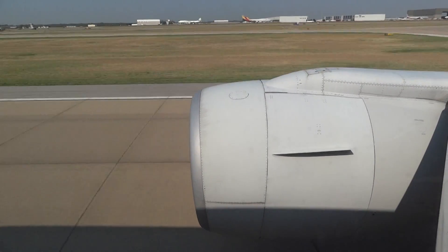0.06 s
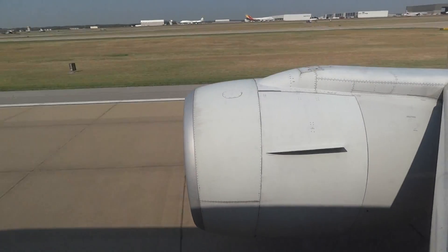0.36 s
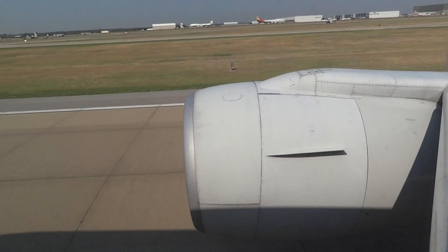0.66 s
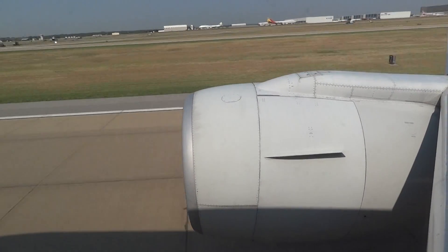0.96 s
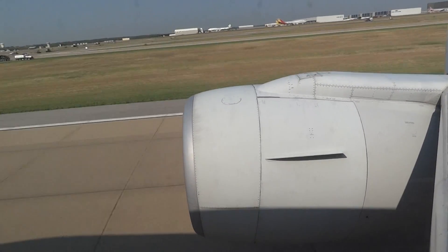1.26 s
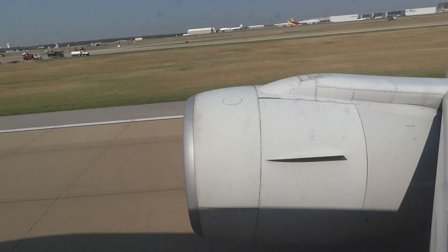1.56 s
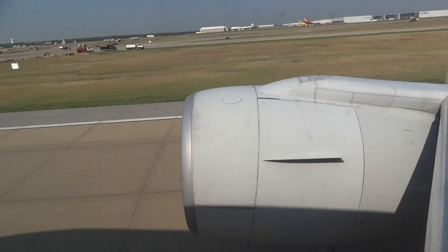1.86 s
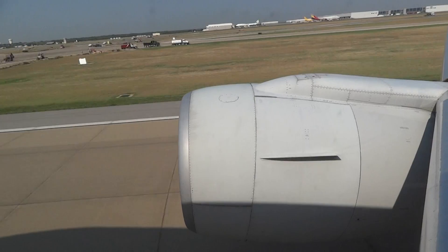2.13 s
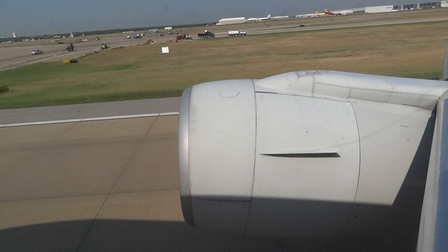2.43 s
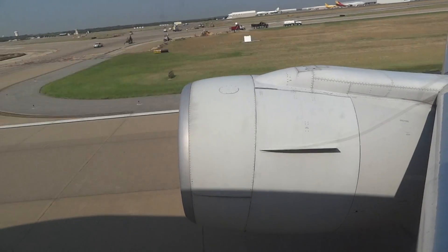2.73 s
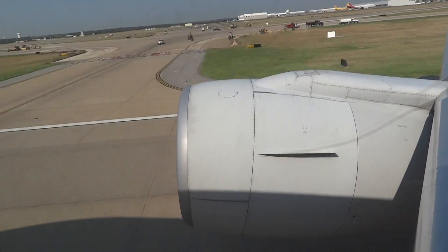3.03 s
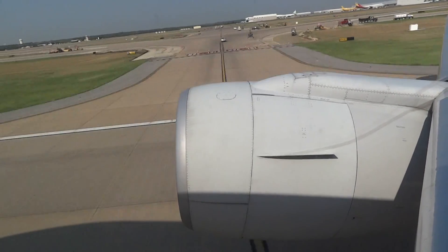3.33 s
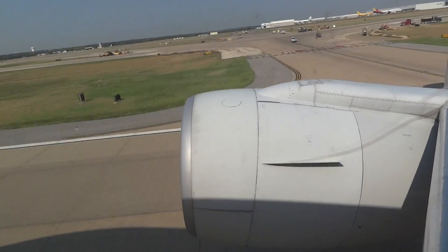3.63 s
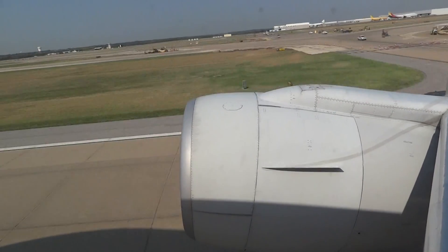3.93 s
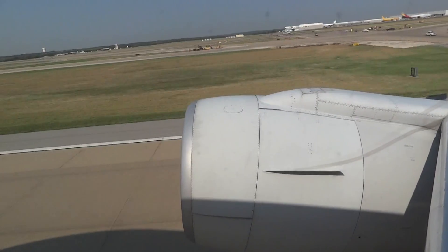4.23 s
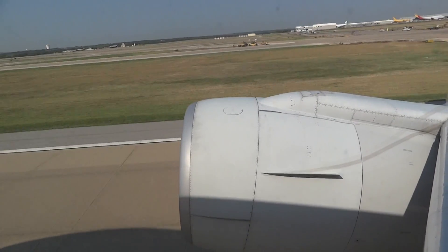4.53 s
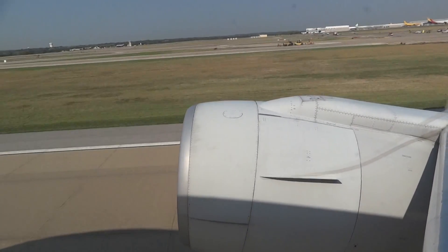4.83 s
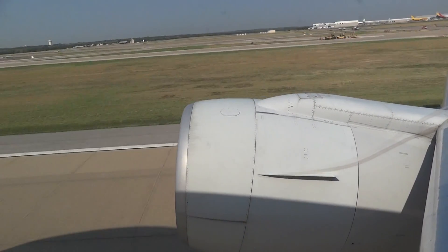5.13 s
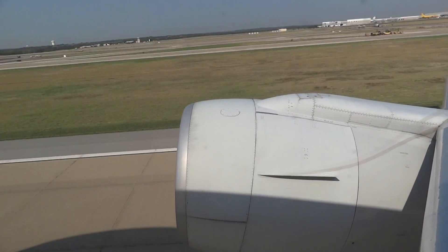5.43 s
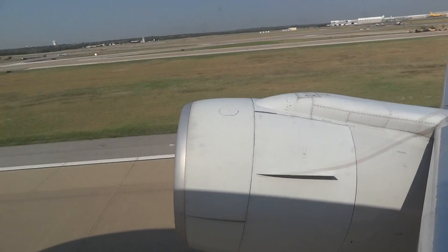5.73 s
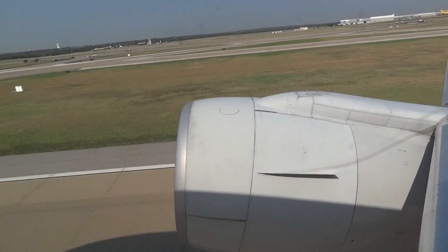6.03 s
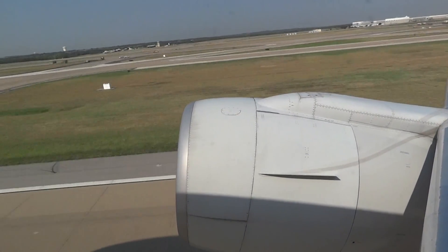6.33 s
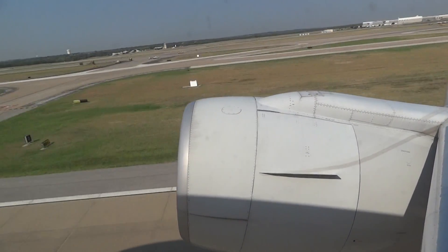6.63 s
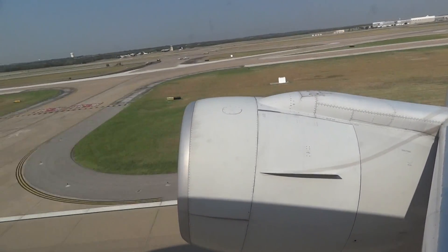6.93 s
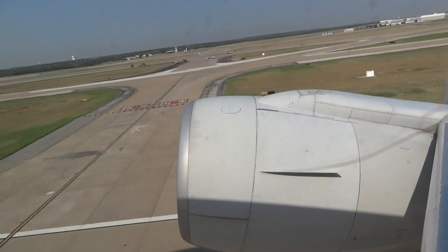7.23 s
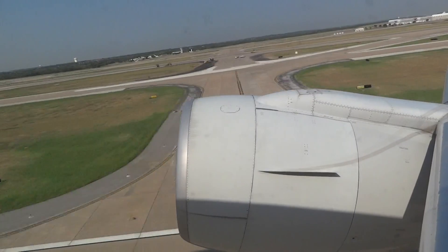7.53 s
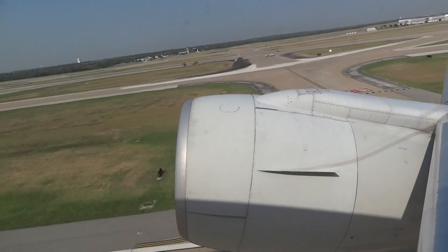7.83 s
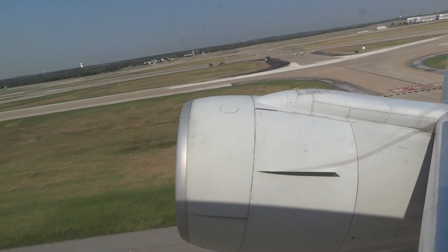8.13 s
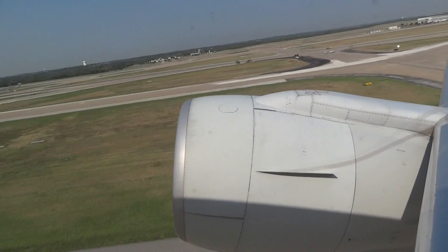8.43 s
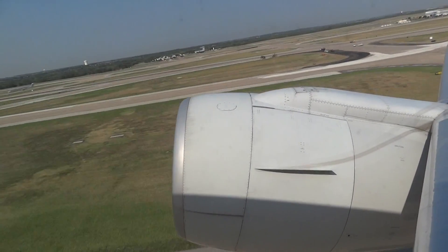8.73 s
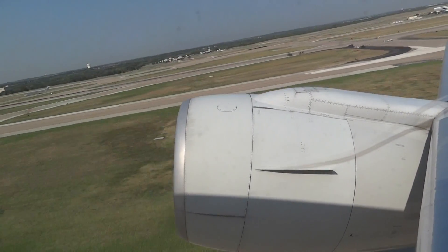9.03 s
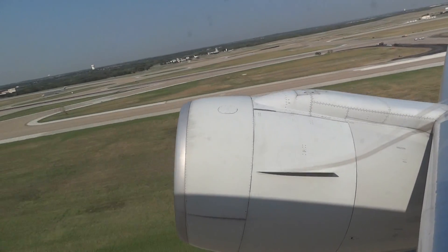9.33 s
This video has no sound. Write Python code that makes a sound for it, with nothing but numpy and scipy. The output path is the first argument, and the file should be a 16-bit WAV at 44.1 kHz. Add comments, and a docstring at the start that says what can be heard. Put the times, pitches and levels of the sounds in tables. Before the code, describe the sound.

A loud, deep jet roar fills an airliner cabin during takeoff, with fan buzz and wavering hums close to a seat by the wing. Wheels rumble and knock faintly below while plastic panels tick, squeak and briefly clatter. After the middle the rumble lessens and a thin air leak hiss sinks in pitch. Toward the end, a high fan whine swells repeatedly over a throbbing drone and a few soft knocks.

```python
"""Jet roar of an airliner lifting off, from a stereo microphone at a window seat over the wing. Exhaust and
airflow boom through the fuselage under the buzz-saw tones of two fans. Wheel rumble fades as the wings take the
weight, and a leaking seal's whistle sinks as cabin pressure shuts it. Dull knocks jolt the airframe; inside the
cabin the trim ticks, clacks and squeaks. The recorder's limiter ducks everything on the peaks of the boom."""
import sys
import numpy as np
from scipy import signal
from scipy.fft import rfft, irfft, next_fast_len
from scipy.io import wavfile

SR = 44100
rng = np.random.default_rng(int(sys.argv[2]) if len(sys.argv) > 2 else 0)


def store_wav(level_fs):
    """Save 16-bit WAV to argv[1]."""
    pcm = np.round(np.clip(np.atleast_2d(level_fs), -1, 1) * 32767)
    wavfile.write(sys.argv[1], SR, pcm.T.astype(np.int16))


N = 413216
TIME = np.arange(N) / SR
FREQS = np.maximum(np.fft.rfftfreq(next_fast_len(N), 1 / SR), 1)
NEAR_SHAFT_HZ, FAR_SHAFT_HZ = 57.35, 57.62

# spectrum of the jolted cabin panels: freq_hz, density_db
PANEL_SPECTRUM = [(200, -47), (700, -66.5), (1200, -67), (2000, -70.5), (2800, -75.5), (4500, -83.5),
                  (8000, -87.5), (12000, -102), (15500, -120)]


def from_db(db):
    """Decibels to gain."""
    return 10 ** (np.asarray(db) / 20)


def at_hz(points, hz):
    """Read a curve on a log-frequency axis."""
    freqs, values = np.transpose(points)
    return np.interp(np.log(hz), np.log(freqs), values)


def over_time(points):
    """Join (time, value) points with straight lines."""
    return np.interp(TIME, *np.transpose(points))


def before(time_s, span_s):
    """A smooth step from 1 down to 0 around a moment."""
    return .5 - .5 * np.tanh((TIME - time_s) / (2 * span_s))


def ramp(end_s):
    """A steady rise from 0 that reaches 1 at a moment and stays there."""
    return np.minimum(TIME / end_s, 1)


def fading(hold_s, db_per_s):
    """A level in dB that holds at 0, then sinks steadily."""
    return -db_per_s * np.maximum(TIME - hold_s, 0)


def swell(start_s, length_s):
    """One rounded rise and fall."""
    return np.sin(np.pi * np.clip((TIME - start_s) / length_s, 0, 1))


def dying(start_s, decay_s, rise_s=0.00052):
    """A quick rise and an exponential tail."""
    envelope = np.zeros(N)
    first = max(int(start_s * SR), 0)
    age = TIME[:min(int(10 * decay_s * SR), N - first)]
    envelope[first:first + len(age)] = (1 - np.exp(-age / rise_s)) * np.exp(-age / decay_s)
    return envelope


def drift(rate_hz):
    """A smooth random curve of spread 1 that changes at about the given rate."""
    coarse_time = TIME[::40]
    size = next_fast_len(len(coarse_time))
    freqs = np.fft.rfftfreq(size, coarse_time[1])
    spectrum = rfft(rng.standard_normal(size)) / (1 + (freqs / rate_hz) ** 2)
    slow = irfft(spectrum, size)[:len(coarse_time)]
    return np.interp(TIME, coarse_time, slow / slow.std())


def white():
    """Spectrum of fresh white noise."""
    return rfft(rng.standard_normal(next_fast_len(N)))


def placed(sound, hz):
    """At this seat, low notes reach the microphone more strongly on the left."""
    # stereo balance: freq_hz, left_minus_right_db
    balance = [(25, 4.6), (60, 5.8), (110, 4.1), (200, 3.5), (380, 2), (700, -.8), (1290, 1.5), (2400, 0.3),
               (8000, 0.2)]
    return sound * from_db(at_hz(balance, hz) * np.array([[.5], [-.5]]))


def noise(spectrum):
    """Stereo noise shaped by a spectrum, partly alike in both channels."""
    # likeness of left and right at the microphone: freq_hz, correlation
    likeness = [(25, 0.87), (60, 0.92), (300, 0.95), (600, 0.84), (720, 0.72), (790, .05), (900, 0.66),
                (1050, 0.8), (2600, 0.88), (4900, 0.86), (6100, 0.98), (8000, 0.9), (14000, .99)]
    alike = np.clip(at_hz(likeness, FREQS), 0, 1)
    side_gain = np.sqrt((1 - alike) / (1 + alike))
    pair = white() + side_gain * white() * [[1], [-1]]
    shape = from_db(at_hz(spectrum, FREQS)) * np.sqrt(SR / 2)
    return irfft(placed(pair, FREQS) * shape)[:, :N]


def ringing(hz, width_hz):
    """A resonance shaken by turbulence: its strength and phase wander; rms 1."""
    phase = 2 * np.pi * hz * TIME
    return drift(.7 * width_hz) * np.cos(phase) + drift(.7 * width_hz) * np.sin(phase)


def wavering(hz, width_hz):
    """A driven resonance: firm in strength while its pitch wavers; rms 1."""
    pitch_hz = hz + .5 * width_hz * drift(width_hz)
    return np.sqrt(2) * np.sin(2 * np.pi * (np.cumsum(pitch_hz) / SR + rng.random()))


def tone(hz, db, flutter_db=0.0, wander=0.00097):
    """A nearly steady tone whose pitch strays by the fraction `wander`."""
    phase = 2 * np.pi * np.cumsum(hz * (1 + wander * drift(7.6))) / SR
    return np.sqrt(2) * from_db(db + flutter_db * drift(26)) * np.sin(phase)


def blows(events, spectrum):
    """Each blow shakes the dense modes of the panels, which die away quickly."""
    envelope = sum(from_db(db) * dying(start, decay) for start, db, decay in events)
    return envelope * noise(spectrum)


def jingle():
    """A small piece of loose metal gives thin, high rings."""
    # rings: start_s, decay_s, pitch_hz, width_hz, level_db
    rings = [(3.216, .02, 13080, 300, -60), (3.394, .015, 13100, 300, -59), (3.424, .03, 14790, 70, -54),
             (3.468, .02, 14700, 70, -55), (3.48, 0.025, 15350, 140, -62), (3.504, .018, 14710, 70, -57)]
    return sum(from_db(db) * dying(start, decay) * wavering(hz, width)
               for start, decay, hz, width, db in rings)


def rattle(jolts_per_s=7.1, level_db=-9, spread_db=6):
    """Small, soft jolts shake the panels at random."""
    sizes = from_db(level_db + spread_db * rng.standard_normal(N))
    jolts = sizes * (rng.random(N) < jolts_per_s / SR)
    envelope = signal.fftconvolve(jolts, dying(0, decay_s=0.0076, rise_s=0.0014))[:N]
    return envelope * noise(PANEL_SPECTRUM)


def trim_ticks():
    """Trim panels around the seat tick in short, bright bursts."""
    # ticks: start_s, level_db, decay_s
    ticks = [(.016, 6, 0.0055), (.036, 0, 0.025), (.124, 4, 0.0066), (.284, -8, .006), (.557, 7, 0.005),
             (.6205, 0, 0.008), (.638, -2, .02), (.707, -6, .006), (.7926, -5, 0.0032), (.962, -7, .004),
             (1.0805, -5, .016), (1.1364, -9.5, .03), (1.478, -11, .008), (1.961, -6, .012),
             (2.16, -6, 0.025), (3.214, 3, 0.012), (3.378, -3, .004), (3.394, -1, 0.0063),
             (3.397, -3, 0.15), (4.504, -7, .003), (4.517, -2, .005), (5.983, -6, .004)]
    # spectrum of a tick: freq_hz, density_db
    tick_spectrum = [(1000, -67), (3000, -77), (6000, -75), (9000, -79), (13000, -90), (15500, -96)]
    return blows(ticks, tick_spectrum)


def trim_squeaks():
    """Plastic trim chirps and rubs; stick and slip is lopsided, which adds an octave. One row is instead a
    faint, breathy high band near 9.8 kHz as the seal closes."""
    # creaks and rubs, and one faint high band from the closing seal: start_s, length_s, pitch_hz, width_hz,
    # level_db, relative_octave_db
    rubs = [(0.03, 0.034, 5780, 520, -31, -14), (.054, 0.038, 5700, 300, -40.5, -15),
            (0.63, 0.046, 5720, 420, -36, -13), (1.635, .025, 6300, 1500, -45, -30),
            (1.65, 0.045, 4230, 180, -46.5, -18), (2.04, 0.2, 6330, 900, -45.5, -26),
            (3.342, 0.025, 6400, 300, -43.5, -30), (3.52, 0.26, 5670, 1100, -46, -26),
            (3.3, 2.6, 5600, 500, -55, -34), (3.5, 3.1, 4750, 900, -56, -34),
            (4.502, .007, 6900, 900, -42, -30), (5.05, .5, 9800, 1300, -60.5, -40),
            (5.965, .028, 6380, 400, -43.5, -32)]
    squeaks = np.zeros(N)
    for start, length, hz, width, db, octave_db in rubs:
        motion = ringing(hz, width)
        octave = from_db(octave_db) * (motion ** 2 - 1)
        squeaks += from_db(db) * swell(start, length) * (motion + octave)
    return squeaks


def panel_clacks():
    """A loose panel hits its frame, and each contact rings its few short modes."""
    # contacts: start_s, level_db
    contacts = [(3.383, -28), (3.4125, -19), (3.416, -25), (3.425, -20), (3.436, -30), (3.447, -28),
                (3.465, -31), (3.486, -28), (4.517, -27), (4.526, -31)]
    # panel modes: pitch_hz, level_db, decay_s
    modes = [(1250, -8, .004), (1650, -6, .004), (2050, -6, .0035), (2450, -4, .0035), (2860, -3, 0.004),
             (3200, -6, .003), (4100, -14, .0025), (5670, -14, .0025), (6900, -15, .0025)]
    ring = sum(from_db(db) * dying(0, decay) * np.sin(2 * np.pi * hz * TIME) for hz, db, decay in modes)
    return sum(from_db(db) * np.interp(TIME - start, TIME, ring) for start, db in contacts)


def knocks():
    """Runway joints under the wheels and jolts of the airframe knock through the cabin."""
    # jolts: start_s, level_db, decay_s
    jolts = [(3.132, 0, .006), (3.215, 8, 0.024), (3.378, 9, 0.011), (3.412, 2, 0.11), (3.482, 7, 0.0087),
             (3.525, 0, 0.031), (3.585, 1.5, .09), (3.72, -7, 0.074), (4.105, -3, .008), (4.259, 2, 0.006),
             (4.281, 0, 0.017), (4.517, 7, 0.006), (4.56, 4.5, 0.051), (7.322, -1, 0.006), (7.36, -3, .03),
             (7.992, 0, .006), (8.363, 4, .006), (8.385, 4, 0.042), (8.587, 8, .006), (8.827, 0.5, 0.037),
             (9.027, 7, 0.006)]
    return blows(jolts, PANEL_SPECTRUM)


def vents(flutter_db=2.5):
    """Air sings unsteadily in narrow passages as speed builds, and dies down in the climb."""
    # air passages: pitch_hz, width_hz, level_db
    passages = [(5950, 260, -58.5), (6260, 220, -55)]
    voices = sum(from_db(db + flutter_db * drift(7)) * ringing(hz, width) for hz, width, db in passages)
    onset = 1 - before(.5, span_s=.15)
    return onset * from_db(fading(hold_s=6.6, db_per_s=2)) * voices


def seal_leak(open_hz=7930, shut_hz=5920, width_hz=1200, cavity_hz=6600, cavity_width_hz=490):
    """Cabin pressure closes a leaking seal: its hiss drops and its breathy whistle slides down."""
    # hiss through the gap: freq_hz, density_db
    hiss_spectrum = [(2000, -125), (3500, -103), (5200, -96), (5950, -81.5), (6350, -82), (6900, -87),
                     (7800, -83), (8200, -86), (8800, -89.5), (9450, -85.5), (9950, -91.5), (10500, -92.5),
                     (11000, -98), (13000, -111), (15500, -122)]
    gap = before(5.74, span_s=0.28)
    hiss_db = 0.5 + fading(hold_s=0, db_per_s=0.2) - 9.5 * (1 - gap)
    whistle_hz = shut_hz + (open_hz - shut_hz) * gap
    # loudest while passing the pitch of the cavity behind the seal
    whistle_db = -59.5 + 9.5 * np.exp(-((whistle_hz - cavity_hz) / cavity_width_hz) ** 2)
    eddies = irfft(white() / (1 + (2 * FREQS / width_hz) ** 4))[:N]
    whistle = np.sqrt(2) * eddies / eddies.std() * np.sin(2 * np.pi * np.cumsum(whistle_hz) / SR)
    return from_db(hiss_db) * noise(hiss_spectrum) + from_db(whistle_db) * whistle


def whines():
    """One whine holds, then fades as speed builds; a faint turbine tone stays above it."""
    early_db = -40 + fading(hold_s=1, db_per_s=24)
    early = tone(hz=1065, db=early_db, flutter_db=2, wander=.003)
    turbine = tone(hz=4275, db=-70)
    return early + turbine


def fan_surges():
    """A clear, high fan whine swells again and again."""
    # surges: start_s, length_s, level_db
    surges = [(1.44, .16, -47), (2.05, .17, -46), (3.48, .22, -47), (5.45, .5, -50), (6.1, .45, -50),
              (6.96, .18, -44), (7.15, .5, -48), (7.72, .16, -42.5), (7.89, .16, -43), (8.05, .2, -44.5),
              (8.33, .18, -44.5), (8.65, .45, -49.5)]
    envelope = sum(from_db(db) * swell(start, length) for start, length, db in surges)
    return envelope * tone(hz=2101, db=0, wander=.002)


def cabin_hums():
    """Resonances of the cabin swell and fade as speed builds."""
    # passing resonances: start_s, length_s, pitch_hz, width_hz, level_db
    hums = [(0.6, 1, 68, 4.8, -20.5), (0.06, 2.4, 153, 8.2, -21), (0, 1.54, 220, 4, -23.5),
            (0.8, 1.9, 223.4, 7.6, -26), (1.56, 2.4, 263.9, 28, -29.5), (1.5, 1.16, 360.8, 88, -29),
            (1.5, 3.3, 145, 14.4, -28.5), (3.5, 3.44, 312.2, 21.82, -26), (3.3, 1.53, 170.1, 10.4, -21),
            (4.5, 0.88, 168, 16.4, -27.5), (5.4, 1.64, 334, 18.5, -26), (4.5, 2.6, 1300, 16.5, -50),
            (5, 5.5, 600, 19.3, -41.5), (7.7, 2.4, 318, 35.3, -27.5), (6.5, 2, 150, 14.3, -31)]
    return sum(placed(from_db(db) * swell(start, length) * wavering(hz, width), hz)
               for start, length, hz, width, db in hums)


def drones(cabin_hz=100.6):
    """A deep cabin boom and the far fan shaft's second order swell and throb against each other."""
    # swells of the cabin boom: time_s, level_db
    boom_levels = [(0.0, -26), (0.05, -17.5), (1.2, -29), (1.36, -22), (1.44, -38), (1.54, -23), (3.1, -31),
                   (3.47, -21), (3.52, -45), (3.58, -20), (6.57, -26), (6.73, -14.5), (6.78, -22),
                   (7.05, -15), (7.1, -26), (7.25, -10), (7.36, -21), (8.22, -24.5), (8.3, -11.5),
                   (8.61, -38), (8.77, -10), (8.85, -35), (9.03, -13.5), (9.16, -27), (9.34, -11),
                   (9.37, -40)]
    # swells of the shaft tone: time_s, level_db
    shaft_levels = [(0.0, -36), (0.52, -30), (0.57, -36), (0.7, -22), (1.54, -35), (1.77, -18),
                    (1.83, -22.5), (2.53, -22.5), (2.66, -24.5), (3.05, -19), (4.23, -24.5), (5.4, -23),
                    (5.95, -26.5), (6.32, -21.5), (8.38, -34.5), (8.48, -15), (8.82, -27.5), (9.06, -21),
                    (9.11, -12), (9.37, -38)]
    boom = from_db(over_time(boom_levels) + 0.5) * wavering(cabin_hz, width_hz=6.914)
    shaft = tone(2 * FAR_SHAFT_HZ, over_time(shaft_levels) + 1.5, flutter_db=2.5, wander=0.012)
    return placed(boom + shaft, cabin_hz)


def rotor(shaft_hz, orders, flutter_db=1.4, wander=.0013):
    """Unequal blades sound at whole multiples of the shaft rate, weakening in the climb."""
    angle = 2 * np.pi * np.cumsum(shaft_hz * (1 + wander * drift(2.75))) / SR
    buzz = np.zeros((2, N))
    for order, db in orders:
        partial = from_db(db + flutter_db * drift(6)) * np.sin(round(order) * angle)
        buzz += placed(partial, order * shaft_hz)
    return np.sqrt(2) * from_db(1.16 + fading(hold_s=5.6, db_per_s=1)) * buzz


def buzz_saw(core_hz=202.9):
    """The near fan's buzz swells and fades over the far fan and the hum of the engine core."""
    # swells of the near fan: time_s, gain_db
    near_gains = [(0, -5), (.9, 3), (1.25, 2), (1.55, -6), (1.72, -3), (1.86, -11), (2.0, 1.5),
                  (2.85, -1.5), (3.4, -4), (3.7, -3), (4.7, -0.5), (5.3, 0.5), (5.6, -1.5), (6.4, -3.5),
                  (6.7, 3), (7.05, 0), (7.25, -5), (7.5, -4), (8.7, -7), (9.0, 4.5), (9.37, -6)]
    # near fan tones: shaft_multiple, level_db
    near_orders = [(23, -44.5), (24, -57)]
    # far fan tones: shaft_multiple, level_db
    far_orders = [(12, -54), (14, -49), (22, -52.5), (25, -54.5), (26, -50.5), (44, -67)]
    # engine core tones: shaft_multiple, level_db
    core_orders = [(1, -32.5), (2, -42.5), (3, -43.5)]
    near = from_db(over_time(near_gains)) * rotor(NEAR_SHAFT_HZ, near_orders)
    return near + rotor(FAR_SHAFT_HZ, far_orders) + rotor(core_hz, core_orders)


def takeoff_roar(nose_up_s=2.9, liftoff_s=5.1):
    """Wheels, exhaust and airflow sound through the fuselage while the wings take the weight."""
    # wheel rumble: freq_hz, density_db
    rumble_spectrum = [(5, -76), (20, -45.5), (32, -42), (48, -45.5), (68, -41), (100, -47), (200, -104),
                       (1000, -140)]
    # jet boom in the cabin: freq_hz, density_db
    boom_spectrum = [(10, -82), (35, -68), (60, -42.5), (85, -40), (108, -36.5), (130, -40), (158, -36),
                     (185, -40.5), (235, -44.5), (330, -54.5), (2000, -140)]
    # exhaust roar: freq_hz, density_db
    jet_spectrum = [(40, -77), (150, -62.5), (240, -48), (285, -41), (335, -42), (410, -46.5), (530, -55),
                    (660, -56.5), (850, -61.5), (1200, -70.5), (1900, -74.5), (2300, -84), (4000, -100),
                    (9000, -140)]
    # air rushing past the fuselage: freq_hz, density_db
    air_spectrum = [(1200, -69.5), (2100, -72.5), (2350, -76), (2750, -75), (3050, -75.5), (3500, -80),
                    (3850, -81), (5100, -87.5), (5600, -84), (6300, -86), (6900, -89), (7900, -94),
                    (8400, -98.5), (9400, -99.5), (9950, -100), (10400, -95.5), (11200, -99.5),
                    (13000, -110), (15500, -122)]
    # cabin and duct resonances driven by the engines: pitch_hz, width_hz, level_db
    resonances = [(156.6, 19, -28), (307.8, 20, -40.5), (451, 24, -45), (596.4, 34, -41.5),
                  (1033.5, 57, -41.5), (1443, 50, -44.5), (1898, 125, -47.5), (2092, 50, -47)]
    wheel_load = 1 - ramp(liftoff_s) ** 2
    on_runway = before(liftoff_s, span_s=.1)
    buffet_db = .5 * drift(rate_hz=4)  # gusts shake both jet and airflow
    jet_db = 2.5 * (ramp(nose_up_s) - 1) + buffet_db  # grows as the nose rises
    air_db = -1.32 + 3.5 * wheel_load + buffet_db  # louder near the ground
    wheels = from_db(-3 + 1.6 * on_runway + 4.5 * wheel_load) * noise(rumble_spectrum)
    boom = from_db(0.46) * noise(boom_spectrum)
    jet = from_db(jet_db - 0.17) * noise(jet_spectrum)
    air = from_db(air_db) * noise(air_spectrum)
    modes = sum(placed(from_db(db + jet_db) * ringing(hz, width), hz) for hz, width, db in resonances)
    return wheels + boom + jet + air + modes


def scene():
    """Everything that reaches the microphone at the window seat."""
    engines = buzz_saw() + whines() + fan_surges()
    rattles = knocks() + trim_ticks() + panel_clacks() + rattle() + trim_squeaks() + jingle()
    cabin = drones() + cabin_hums() + seal_leak() + vents()
    return rattles + cabin + engines + takeoff_roar()


def record(dry, threshold_db=-8.5, release_db_per_s=176, attack_s=0.00088, makeup_db=2.5):
    """A fast limiter ducks each peak, bass more than treble, and recovers steadily; the top is cut."""
    crossover_hz, cutoff_hz = 370, 16400
    peak_db = 20 * np.log10(np.abs(dry).max(axis=0) + 1e-9)
    over_db = np.maximum(peak_db - threshold_db, 0)
    recovery_db = release_db_per_s * TIME
    held_db = np.maximum.accumulate(over_db + recovery_db) - recovery_db
    pole = np.exp(-1 / (attack_s * SR))
    cut_db = signal.filtfilt([1 - pole], [1, -pole], held_db)  # looks slightly ahead
    bass = signal.sosfiltfilt(signal.butter(2, crossover_hz, fs=SR, output="sos"), dry)
    treble = dry - bass
    limited = bass * from_db(-cut_db) + treble * from_db(-1.46 - 0.67 * cut_db)
    top_cut = signal.cheby2(16, 70, cutoff_hz, fs=SR, output="sos")
    return signal.sosfilt(top_cut, from_db(makeup_db) * limited)


dry = scene()
out = record(dry)
store_wav(out)
```